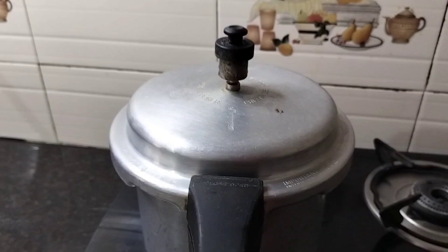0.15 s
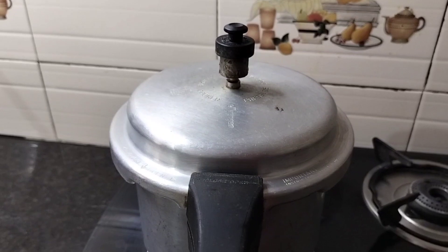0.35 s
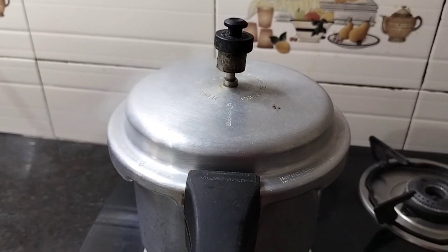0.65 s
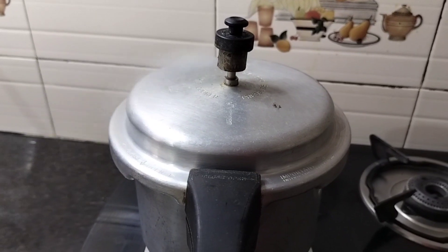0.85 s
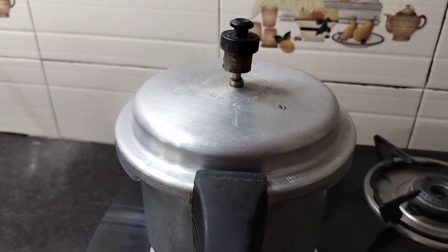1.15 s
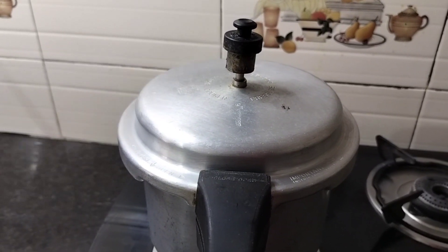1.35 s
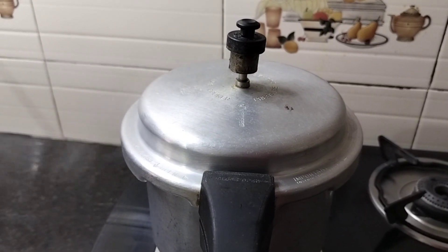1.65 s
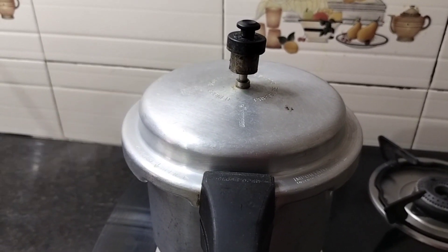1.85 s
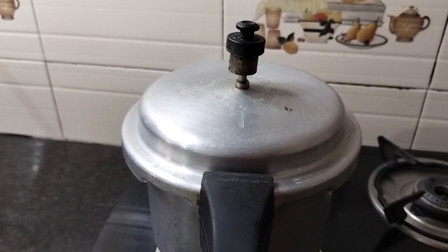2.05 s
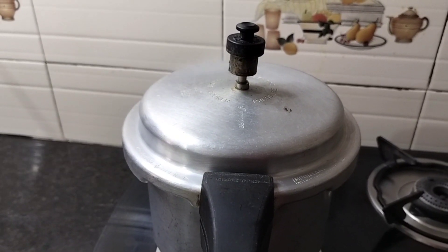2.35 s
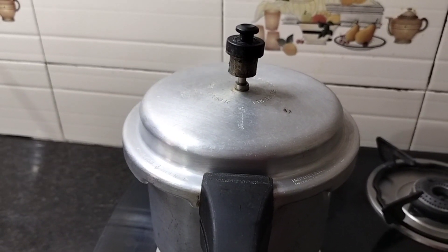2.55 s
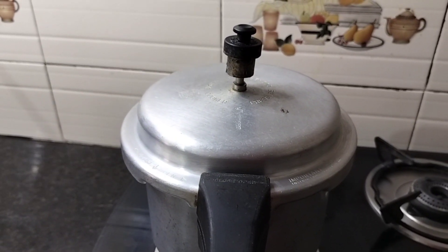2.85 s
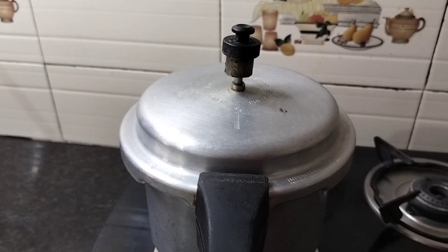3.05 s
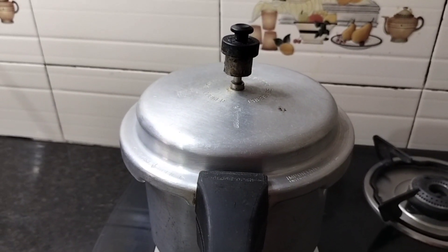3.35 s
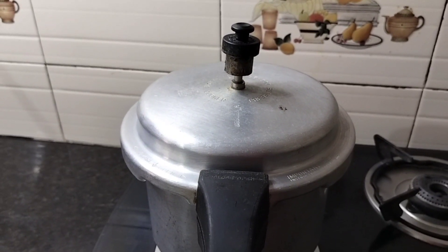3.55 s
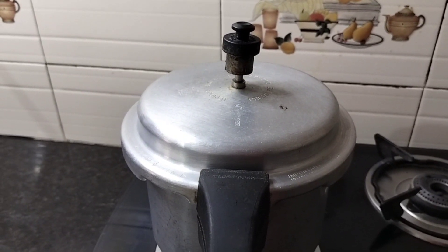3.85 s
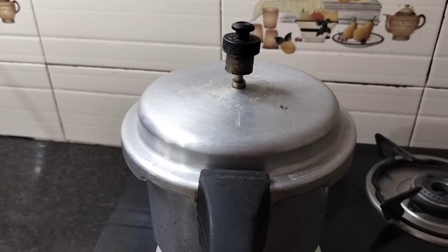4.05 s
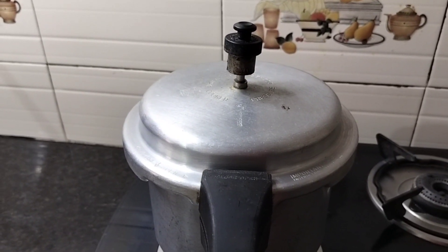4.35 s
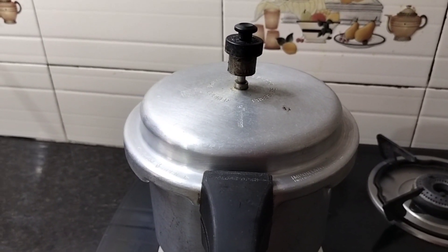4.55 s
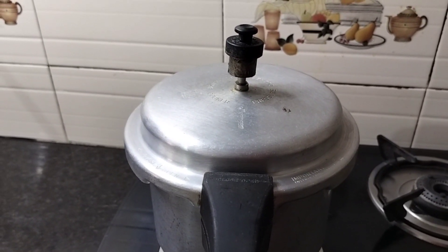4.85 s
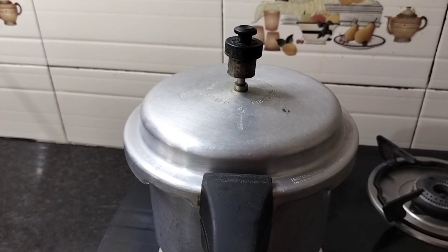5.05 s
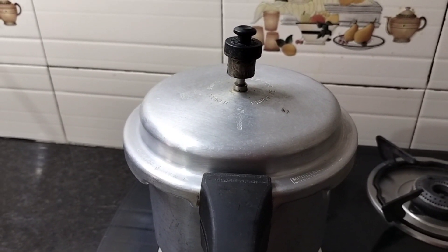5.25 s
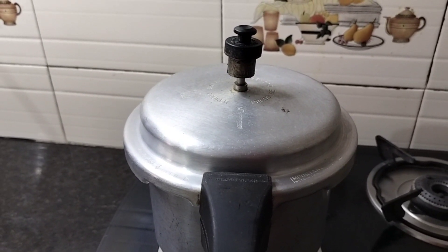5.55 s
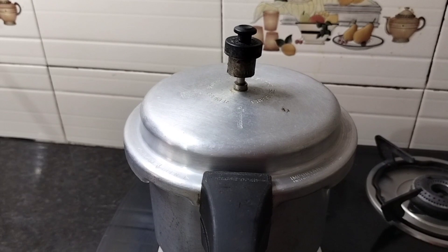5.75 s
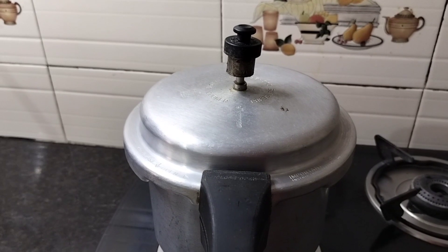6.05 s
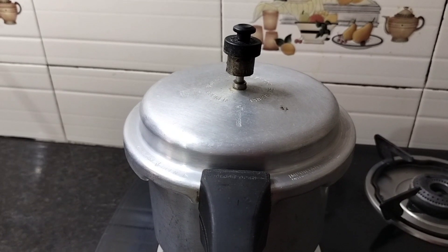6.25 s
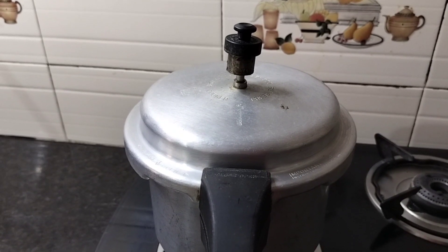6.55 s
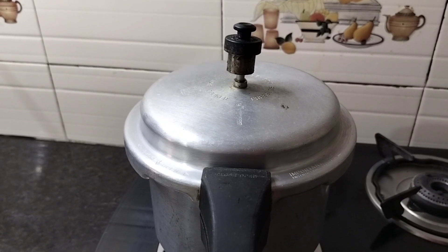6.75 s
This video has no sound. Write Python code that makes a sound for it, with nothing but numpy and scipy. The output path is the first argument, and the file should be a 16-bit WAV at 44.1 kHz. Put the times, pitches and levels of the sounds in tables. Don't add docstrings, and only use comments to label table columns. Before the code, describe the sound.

In a small tiled kitchen, faint room hum stops and a full gap follows. Then steam roars past a pressure cooker weight, strongest at first, settling into a steady sharp hiss. Close stereo phone microphones are hit by irregular puffs, heavy pops and clipped thuds, easing late before a rough final gust.

```python
import sys
import numpy as np
from scipy import signal
from scipy.fft import rfft, irfft, next_fast_len
from scipy.io import wavfile
from scipy.ndimage import uniform_filter1d

SR = 44100
rng = np.random.default_rng(int(sys.argv[2]) if len(sys.argv) > 2 else 0)


def undo_db(level):
    steps = np.asarray(level, float) / 20
    return 10 ** steps


def master_out(mix):
    frames = np.transpose(np.atleast_2d(mix))
    ceiling = np.clip(frames, -1, 1)
    pcm = np.round(ceiling * 32767).astype(np.int16)
    wavfile.write(sys.argv[1], SR, pcm)


N = 304498
TIME = np.arange(N) / SR
FAST_LENGTH = next_fast_len(N + N % 2, True)
FREQ = np.arange(FAST_LENGTH // 2 + 1) * SR / FAST_LENGTH
SIZE = 2 * (len(FREQ) - 1)
CUT_OUT_S, CUT_IN_S = 0.161, 0.837
SIDES = np.array([[0.5], [-0.5]])


def level(x, db):
    return x * undo_db(db) / np.sqrt(np.mean(abs(x) ** 2))


def curves(table):
    s, *columns = np.transpose(table)
    return [np.interp(TIME, s, column) for column in columns]


def slope_db(points):
    hz, db = np.transpose(points)
    return np.interp(np.log(FREQ + 1), np.log(hz), db)


def bump(hz, width):
    return 1 / (1 + (2 * (FREQ - hz) / width) ** 2)


def delayed(ms):
    return np.exp(-2j * np.pi * np.outer((0, ms / 1000), FREQ))


def colour(x, db):
    return irfft(rfft(x, SIZE) * undo_db(db), SIZE)[..., :N]


def walk(rate):
    hold = int(SR / rate)
    held = np.repeat(rng.standard_normal(N // hold + 1), hold)
    return 0.91 * uniform_filter1d(uniform_filter1d(held, hold), hold)[:N]


# f/Hz, level/dB [dB per Hz]
ROOM_SPECTRUM = [(25, -28), (60, -11), (90, -0.5), (160, -15), (300, -20), (600, -29), (1200, -31),
                 (2500, -36.5), (5000, -43), (9000, -54), (14000, -68)]
# f/Hz [Hz], width/Hz [Hz], level/dB [dB]
ROOM_RINGS = [
    (3050, 100, 16),
    (3540, 70, 16),
    (1740, 43, 15),
    (1030, 110, 6),
]


def kitchen():
    shape_db = slope_db(ROOM_SPECTRUM) + sum(db * bump(hz, width) for hz, width, db in ROOM_RINGS)
    mid, side = rng.standard_normal((2, N))
    side = colour(side, 20 * np.log10(np.clip(FREQ / 800, 0.15, 1)))
    return level(colour(np.array([mid + side, mid - side]), shape_db), -42.5)


def membrane(step, overshoot):
    overshoot_ms, leak_hz, softest_edge_hz = 0.4, 28.5, 6900
    mount_hz, mount_width_hz, mount_share = 130.0, 60.0, 0.6
    fade = np.exp(-1000 / (overshoot_ms * SR))
    pressure = np.cumsum(step, axis=-1) + signal.lfilter([1], [1, -fade], overshoot)
    vent = signal.butter(2, leak_hz, "high", fs=SR, output="sos")
    leaked = signal.sosfilt(vent, pressure)
    mount = signal.iirpeak(mount_hz, mount_hz / mount_width_hz, SR)
    shaken = leaked + mount_share * signal.lfilter(*mount, leaked)
    return signal.sosfilt(signal.butter(2, softest_edge_hz, fs=SR, output="sos"), shaken)


def steps(table):
    s, step, overshoot = np.transpose(table)
    train = np.zeros((2, N + SR))
    np.add.at(train, (slice(None), (s * SR).astype(int)), np.array([step, overshoot]))
    return train[:, :N]


# t/s [s], level/dB [dB], left minus right level/dB [dB]
EDDY_DRAUGHT = [(0.84, -29.5, 1), (1.0, -27.5, -5.5), (1.25, -33.5, -1), (1.56, -29, 10.5),
                (1.95, -32.5, 0), (2.3, -34.5, 1), (2.75, -40.5, -5.5), (3.2, -34.5, 1), (3.5, -34.5, 0),
                (3.75, -34.5, -1), (4.2, -30.5, 3), (4.75, -32, 5), (5.1, -35, 4), (5.6, -37.5, -2),
                (6.3, -39, -4), (6.65, -29, -0.5), (6.8, -27.5, 7), (6.86, -16, 3)]
# t/s [s], signed step, signed
LEFT_STEPS = [(0.8389, 0.41, 0.0005), (0.8634, 0.23, 0.16), (0.9829, 0.58, -0.17), (1.1166, 0.41, 0.06),
              (1.1421, 0.24, 0.052), (1.4016, 0.46, -0.01), (1.5707, 0.44, -0.03), (1.6911, 0.38, -0.056),
              (1.7439, 0.57, -0.22), (1.8647, 0.43, -0.0058), (1.9906, 0.48, 0.0033), (2.0271, 0.4, -0.1),
              (2.1475, 0.3, -0.26), (2.3735, 0.17, -0.06), (2.771, 0.23, -0.045), (3.1676, 0.28, -0.1),
              (3.4672, 0.27, 0.03), (4.0259, 0.29, -0.099), (4.1507, 0.29, 0.09), (4.1803, 0.3, -0.018),
              (4.3224, 0.22, 0.036), (4.5098, 0.27, -0.68), (4.8504, 0.39, 0.1), (4.9723, 0.44, -0.03),
              (5.1867, 0.38, -0.06), (2.9962, 0.17, 0.051), (3.6683, 0.15, 0.079), (4.2613, 0.17, 0.35),
              (4.4366, 0.2, -0.016), (4.6044, 0.24, 0.06),
              (0.876, -0.55, -0.15), (1.072, -0.21, -0.13), (1.2707, -0.16, -0.075), (1.3791, -0.32, 0.075),
              (1.4278, -0.37, 0.058), (1.5276, -0.34, 0.01), (1.6982, -0.43, -0.09), (1.7756, -0.34, 0.32),
              (2.5151, -0.21, 0.065), (3.1894, -0.33, 0.11), (3.502, -0.11, -0.58), (4.169, -0.43, 0.15),
              (4.5869, -0.42, 0.11), (4.751, -0.38, 0.03), (4.8816, -0.31, 0.49), (4.8991, -0.43, 0.042),
              (4.9115, -0.74, 0.09), (5.0062, -0.27, 0.013), (5.0763, -0.18, -0.17), (1.5731, -0.39, 0.24),
              (1.1184, -0.43, 0.04), (1.8707, -0.21, 0.29), (4.2219, -0.17, 0.0078), (4.8488, -0.12, -0.15),
              (1.9347, -0.2, -0.049),
              (5.3564, -0.17, -0.01), (5.406, 0.26, -0.03), (5.7966, 0.34, 0.04),
                     (5.8831, 0.53, -0.049), (5.9051, -0.19, -0.045), (6.4287, 0.18, 0.016),
                     (6.6439, 0.24, -0.059), (6.6888, 0.27, 0.26), (6.6904, -0.28, 0.16),
                     (6.7448, -0.54, 0.083), (6.7574, 0.66, 0.03), (6.763, 0.16, -0.77),
                     (6.8083, 0.054, 0.68), (6.8315, -0.53, 0.034), (6.8473, 0.45, -0.71),
                     (6.87, -0.42, -0.37), (6.883, -0.25, 0.76), (6.8937, -0.55, -0.61)]
# t/s [s], step, overshoot [full scale]
RIGHT_STEPS = [(0.8723, 0.24, -0.07), (0.9166, -0.27, 0.2), (0.9634, -0.4, 0.56), (1.0463, -0.17, 0.077),
               (1.1256, -0.25, 0.53), (1.1884, -0.19, 0.09), (1.6658, 0.25, 0.093), (1.8705, -0.22, 0.01),
               (2.0022, -0.2, -0.067), (2.4412, -0.18, 0.11), (2.6746, -0.15, 0.1), (2.731, -0.44, 0.07),
               (3.3225, -0.21, 0.14), (3.3941, -0.074, 0.26), (3.5507, -0.13, 0.06), (3.8077, -0.17, 0.023),
               (3.8249, -0.24, 0.07), (3.9022, -0.011, 0.16), (3.9563, -0.11, 0.23), (4.2786, -0.066, 0.31),
               (5.0495, -0.16, -0.05), (5.6997, -0.36, -0.039), (6.0747, -0.53, -0.15),
               (6.2756, -0.23, 0.07), (6.6434, 0.059, 0.35), (6.6648, -0.3, -0.043), (6.8708, -0.15, 0.76),
               (6.8102, -0.58, 0.19), (6.8577, -0.42, 0.22), (6.9011, -0.54, -0.26)]


def buffeting():
    calm_db, eddies_per_s, doubling_db = -31.5, 250, 11
    snap, snap_db_per_db = 0.82, 0.5
    eddy_db, pan_db = curves(EDDY_DRAUGHT)
    gust_db = np.maximum(eddy_db - calm_db, 0)
    rate = eddies_per_s * 2 ** (gust_db / doubling_db)
    hit = (rng.random((2, N)) < rate / SR) * np.sqrt(eddies_per_s / rate)
    sign = rng.choice([-1, 1], (2, N))
    size = hit * sign * undo_db(np.minimum(4.44 * rng.exponential(size=(2, N)), 15))
    spread = snap * undo_db(snap_db_per_db * gust_db)
    small = membrane(size, size * (-0.3 + spread * rng.standard_normal((2, N))))
    left = membrane(*steps(LEFT_STEPS))
    right = membrane(*steps(RIGHT_STEPS))
    return np.array([left, right]) + level(small, 0) * undo_db(eddy_db + 1.5 + SIDES * pan_db)


# t/s [s], level/dB [dB]
STEAM_FLOW = [(0.84, -19), (1.02, -22), (1.33, -24.5), (1.63, -26), (2.3, -27), (2.68, -27), (3.07, -26.5),
              (4.2, -25.5), (5.13, -25.5), (6.46, -25.5), (6.88, -23)]


def seat():
    seat_hz, width_hz, pan_db = 11350, 950, -3.0
    seat_db, settle_db, settle_s = -3.5, 6, 1.5
    flow_db, = curves(STEAM_FLOW)
    ring = rfft(rng.standard_normal(SIZE)) * bump(seat_hz, width_hz)
    ring = irfft(ring * delayed(VENTS_AROUND_WEIGHT[0][0]), SIZE)[:, :N]
    lift_db = settle_db * np.exp(-(TIME - CUT_IN_S) / settle_s)
    return level(ring, -6.5) * undo_db(flow_db + seat_db + lift_db + SIDES * pan_db)


# f/Hz [Hz], width/Hz [Hz], level/dB [dB against the whole jet]
CAVITY_MODES = [
    (4120, 480, -13.5),
    (3577, 270, -21.5),
    (5350, 360, -21),
]


def valve():
    blow = rfft(rng.standard_normal(SIZE))
    ring = sum(level(blow * bump(hz, width), db) for hz, width, db in CAVITY_MODES)
    return ring * delayed(0.3)


# right port delay [ms], level/dB [dB], tilt [dB per octave]
VENTS_AROUND_WEIGHT = [
    (.07, 1.5, 2),
    (.29, 0, -3),
    (.81, 0.5, -1),
    (1.069, 2, -1.5),
    (1.7, -4.5, -1.5),
]
# f/Hz [Hz], level/dB [dB per Hz]
JET_SPECTRUM = [(250, -25.5), (600, -16), (1600, -13.5), (2200, -4.5), (2700, -3), (3200, 1.5), (4000, 0.5),
                (5500, -1), (8000, 0), (11700, -2.5), (13300, -5), (15700, -6.5)]


def plume():
    tiles_t60_s, tiles_db = 0.23, -0.5
    t, heard = TIME[:SR // 3], 0
    for ms, db, tilt_db in VENTS_AROUND_WEIGHT:
        tail = rng.standard_normal((2, len(t))) * undo_db(-60 * t / tiles_t60_s) * (t > 0.002)
        tail = rfft(tail, SIZE) * undo_db(tiles_db) / np.sqrt(np.sum(tail[0] ** 2))
        vent_db = db + tilt_db * np.log2((FREQ + 100) / 5000)
        heard = heard + rfft(rng.standard_normal(SIZE)) * (delayed(ms) + tail) * undo_db(vent_db)
    heard = heard / np.sqrt(uniform_filter1d(np.mean(abs(heard) ** 2, axis=0), size=SIZE // 20))
    return level(heard * undo_db(slope_db(JET_SPECTRUM)), 0)


# f/Hz [Hz], width/Hz [Hz], left level/dB, right level/dB [dB]
PORT_SHADING = [(9340, 1700, -7.5, 2), (1210, 1170, 2, 6), (3400, 660, -4, 0), (14800, 3600, -2, 4.5),
                (2185, 82, -14, -6), (3180, 160, -8, -4), (4550, 210, -2, -2), (5400, 160, -7, -0.5),
                (6760, 660, -0.5, -2.5), (12500, 410, 2, 1), (14500, 400, -7, -6.5), (8480, 380, -5, -1)]


def jet():
    upper_db_per_s, treble_db_per_s = 0.62, 0.25
    pan_db, treble_wander_db = 1.17, 1.3
    flow_db, = curves(STEAM_FLOW)
    shade_db = sum(np.outer((left, right), bump(hz, width)) for hz, width, left, right in PORT_SHADING)
    spectrum = (plume() + valve()) * undo_db(shade_db)
    octave = np.log2((FREQ + 1) / 6500)
    age = TIME - TIME.mean()
    treble_db = treble_db_per_s * age + SIDES * treble_wander_db * walk(2.86)
    hiss = 0
    for centre in np.arange(-5, 3):
        band = irfft(spectrum * np.clip(1 - abs(octave - centre), 0, 1), SIZE)[:, :N]
        drift_db = treble_db if centre > 0 else upper_db_per_s * age * (centre == 0)
        hiss = hiss + band * undo_db(drift_db + 0.55 * walk(7.2) + 0.5 * walk(24.8))
    return level(hiss, 0) * undo_db(flow_db + 7.5 + SIDES * pan_db)


def scene():
    lead_in_s, lead_in_db, lead_fade_db = 0.0085, -9.0, -14.0
    early = (TIME - CUT_IN_S) / lead_in_s + 1
    lead_in = (early > 0) * undo_db(lead_in_db + lead_fade_db * np.clip(early, 0, 1))
    cut_out = np.clip((CUT_OUT_S - TIME) * 400, 0, 1)
    steam = jet() + seat() + buffeting()
    return kitchen() * cut_out + steam * np.where(early > 1, 1, lead_in)


def low_pass(x):
    return signal.sosfilt(signal.butter(12, 15745, fs=SR, output="sos"), x)


def record(dry):
    clipped = np.clip(dry, -0.86, 0.86)
    return low_pass(clipped)


dry = scene()
out = record(dry)
master_out(out)
```